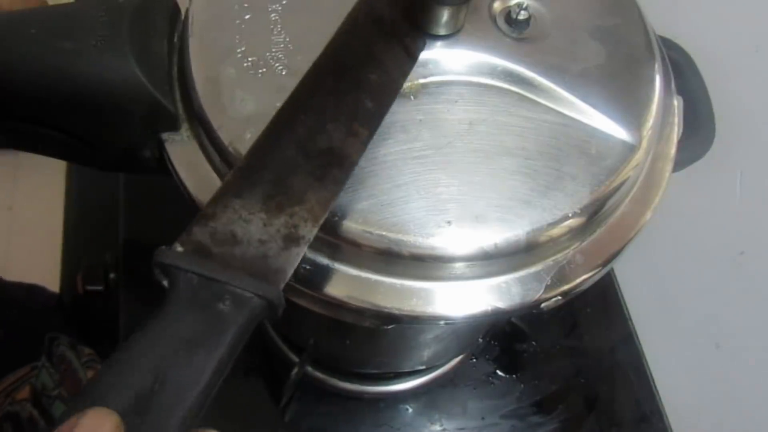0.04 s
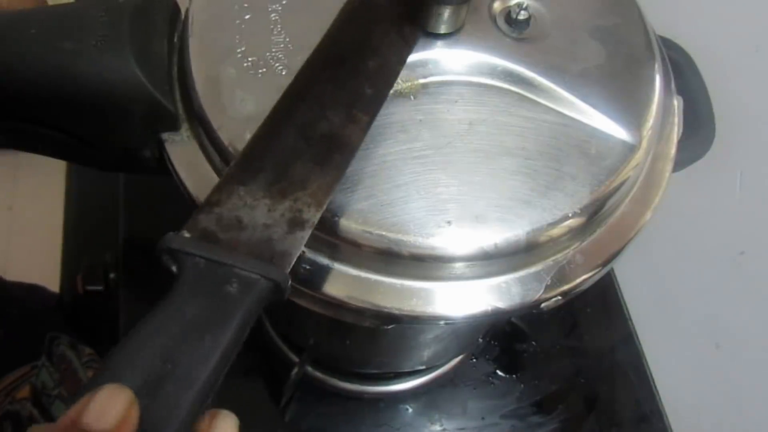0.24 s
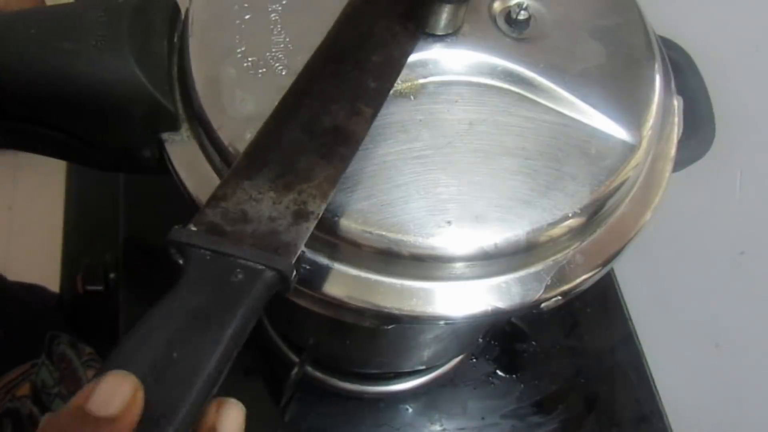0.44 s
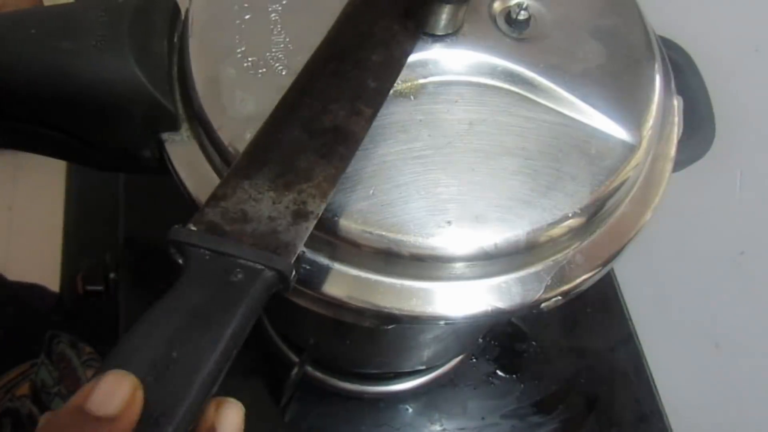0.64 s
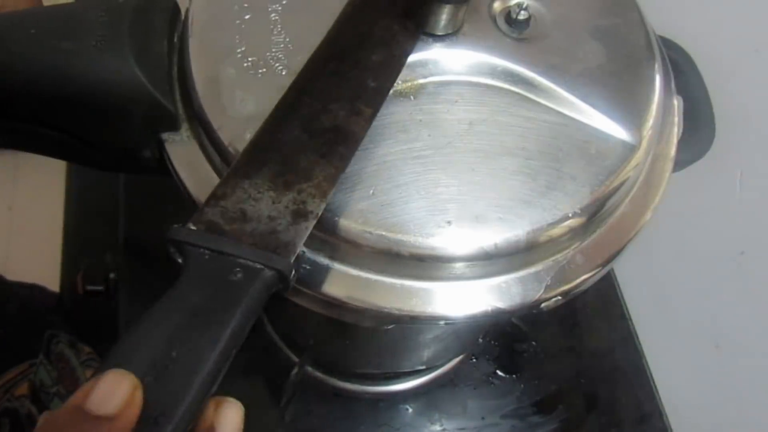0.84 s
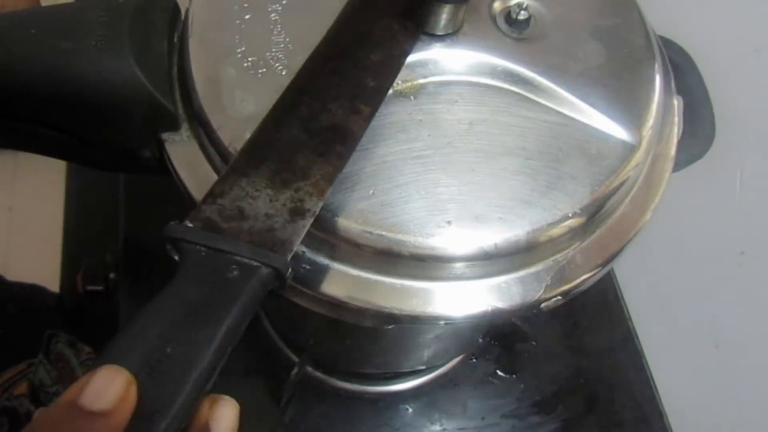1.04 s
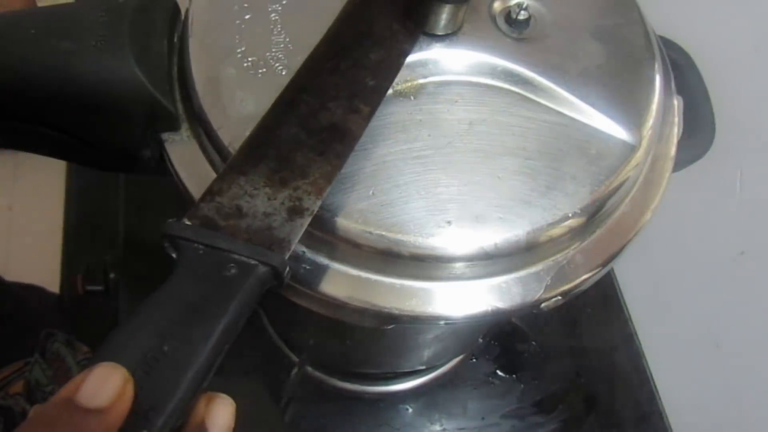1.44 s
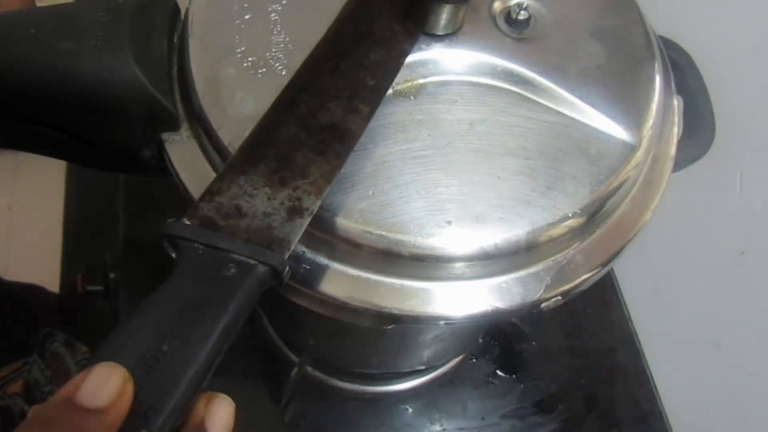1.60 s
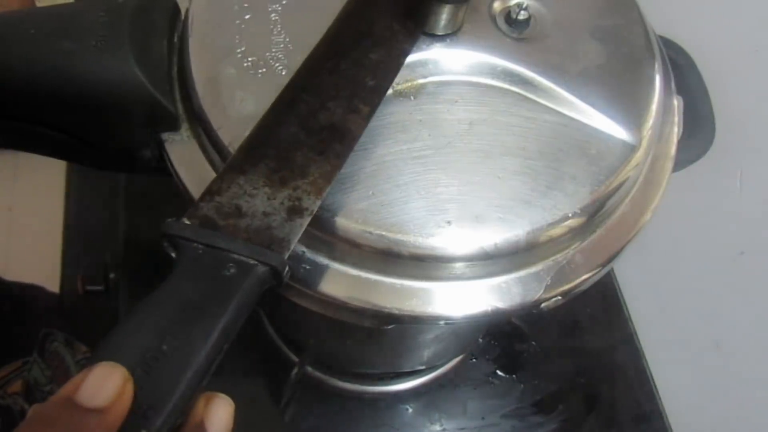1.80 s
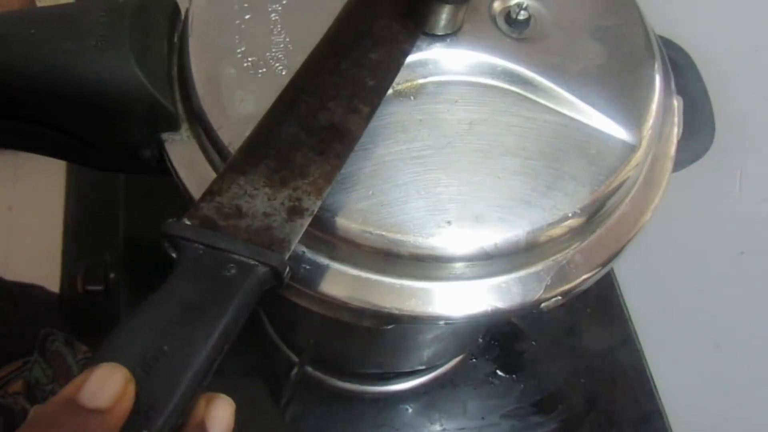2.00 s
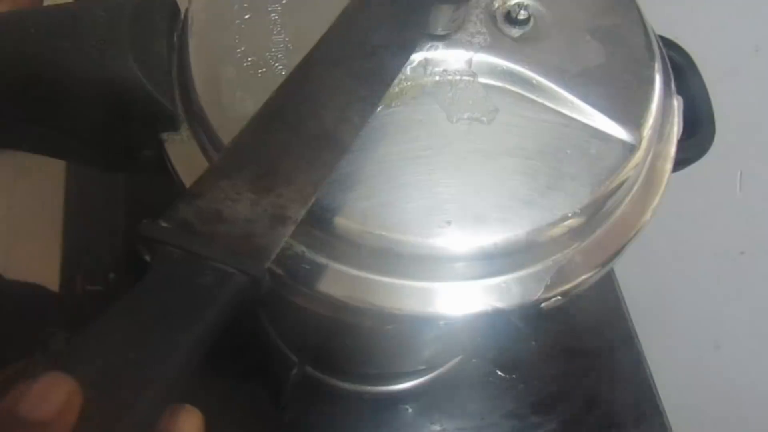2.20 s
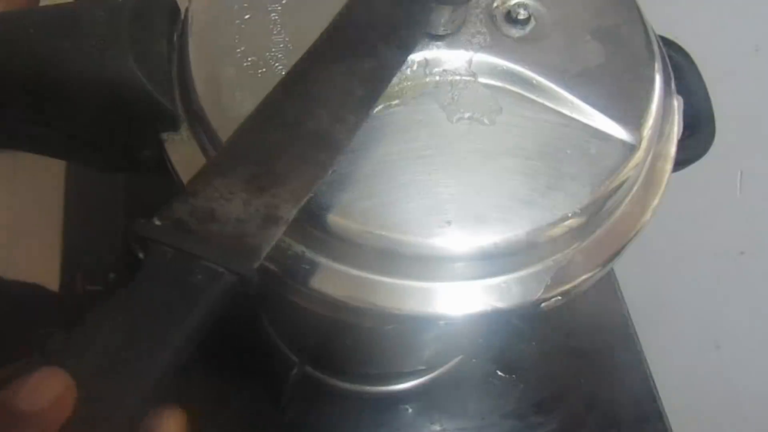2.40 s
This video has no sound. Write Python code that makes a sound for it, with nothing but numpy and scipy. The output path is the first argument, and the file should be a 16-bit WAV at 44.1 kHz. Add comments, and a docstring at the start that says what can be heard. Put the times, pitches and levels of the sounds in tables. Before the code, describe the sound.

A pressure cooker releases a bright, hissing jet of steam before its weight clinks back down.

```python
"""A bright jet of steam blows from a pressure cooker for two seconds, ringing the cavities of its valve.
A thin whistle leaks first; then a knife lifts the weight, and wet steam sputters as the jet opens.
The weight sinks, the jet dies to a sizzling leak, and the metal knocks on the lid as it settles.
The cooker is close by in a kitchen, with the burner running underneath."""
import sys
import numpy as np
from scipy import signal
from scipy.fft import rfft, irfft
from scipy.io import wavfile
from scipy.ndimage import uniform_filter1d

SR = 44100
rng = np.random.default_rng(int(sys.argv[2]) if len(sys.argv) > 2 else 0)


def inscribe(sig):
    """Save sig as 16-bit PCM at rate SR to the path in sys.argv[1].

    A 1-D sig is mono; a 2-D sig holds one channel per row.
    Samples are clipped to [-1, 1] before scaling.
    """
    pcm = np.round(np.clip(np.atleast_2d(sig).T, -1, 1) * 32767)
    wavfile.write(sys.argv[1], SR, pcm.astype(np.int16))


N = 112454


def undb(db):
    """Decibels to amplitude ratio."""
    return 10 ** (np.asarray(db) / 20)


def unit(x):
    """Normalisation to rms 1."""
    return x / np.sqrt(np.mean(x ** 2))


def envelope(rows):
    """Gain interpolated through (seconds, dB) points, silent outside them."""
    s, db = np.array(rows).T
    return undb(np.interp(np.arange(N) / SR, s, db, left=-np.inf, right=-np.inf))


def colour(x, spectrum, resonances=()):
    """Source-filter model: a broad spectrum and narrow resonances shape x; the result has rms 1."""
    f = np.arange(N // 2 + 1) * SR / N + 1
    hz, db = np.array(spectrum).T
    gain = undb(np.interp(np.log(f), np.log(hz), db))
    for centre, width, lift in resonances:
        detuning = 2 * (f - centre) / width
        gain *= np.sqrt(1 + (undb(lift) ** 2 - 1) / (1 + detuning ** 2))
    return unit(irfft(rfft(x) * gain, N))


def wander(hz):
    """Low-passed noise: smooth random motion of rms 1."""
    span = max(int(SR / hz), 1)
    return unit(uniform_filter1d(uniform_filter1d(rng.standard_normal(N), span), span))


def strike(rows, ring):
    """Superposition of a fresh ring(age) per (seconds, dB) row, levelled by its first 10 ms."""
    out, age = np.zeros(N), np.arange(N) / SR
    for s, db in rows:
        start, sound = int(s * SR), ring(age)
        out[start:] += undb(db) * sound[:N - start] / np.std(sound[:SR // 100])
    return out


def kitchen(x, wet_db, t60_s=0.18):
    """Reverberation: dense reflections from hob and walls decay exponentially."""
    age = np.arange(SR // 2) / SR
    tail = rng.standard_normal(len(age)) * np.exp(-np.log(1000) * age / t60_s) * (age > .002)
    return x + undb(wet_db) * signal.fftconvolve(x, tail / np.linalg.norm(tail))[:N]


# Spectrum of the burner. Each row: frequency in Hz, relative density in dB.
BURNER_SPECTRUM = [(25, -20), (45, -21), (64, -10.5), (85, -4.5), (165, -4), (230, -1.5), (320, 1.5),
                   (700, -2), (1400, 2), (1900, -6.5), (4000, -3.5), (5200, -14), (6600, -12), (7400, -17),
                   (8000, -31), (11000, -20), (15000, -37)]

def burner(level_db=-50, waver_db=1.9):
    """Random amplitude modulation: the burner's broadband noise wavers slowly."""
    noise = colour(rng.standard_normal(N), BURNER_SPECTRUM)
    return noise * undb(level_db + waver_db * wander(hz=9.6))


# Course of the low rush. Each row: time in seconds, level in dB.
RUSH_LEVELS = [(0, -46.5), (.2, -53), (.3, -47), (.5, -57), (.95, -49), (1.15, -61), (2.08, -56.5),
               (2.12, -55), (2.2, -80), (2.55, -73)]
# Its spectrum. Each row: frequency in Hz, relative density in dB.
RUSH_SPECTRUM = [(25, -13), (62, -8), (110, -3.5), (170, -5.5), (230, -5.5), (310, 4), (600, -6.5),
                 (1200, -10), (3000, -29)]

def rush():
    """Flow noise: the low-frequency part of the escaping steam."""
    return colour(rng.standard_normal(N), RUSH_SPECTRUM) * envelope(RUSH_LEVELS)


# Whistle of the seated valve. Each row: time in seconds, level in dB.
WHISTLE_LEVELS = [(0, -70), (.045, -61), (.115, -61), (.14, -72)]

def whistle(pitch_hz=6590, waver=.003):
    """Edge tone: the leak sounds one wavering pitch before the weight lifts."""
    hz = pitch_hz * (1 + waver * wander(hz=400))
    return np.sqrt(2) * np.sin(2 * np.pi * np.cumsum(hz) / SR) * envelope(WHISTLE_LEVELS)


# Modes of the lid. Each row: frequency in Hz, relative level in dB, time to fall 60 dB in seconds.
LID_MODES = [(343, -2, 0.54), (425, -3.5, 0.25), (553, 3, 0.075), (610, 1, .11), (790, -7, 0.09),
             (896, 7.5, .06), (1056, -5, 0.058), (1350, -7, 0.096), (1574, 3, 0.07), (2340, 4, 0.047)]
# Knocks of weight and knife on the lid. Each row: start in seconds, level in dB.
KNOCKS = [(2.112, -37), (2.457, -33.5), (2.4698, -29), (2.5005, -36), (2.522, -46), (2.543, -51)]
# Spectrum of the contact. Each row: frequency in Hz, relative density in dB.
CRACK_SPECTRUM = [(120, -31), (240, -24), (340, 0), (900, 7), (1600, -1), (3000, -7), (7000, -21),
                  (15000, -42)]

def knocks(spread_db=2.6, crack_db=6.5, crack_decay_s=0.0065):
    """Modal vibration: each impact cracks and rings the lid, which is too small to radiate bass."""
    low_cut = signal.butter(4, 300, "high", fs=SR, output="sos")

    def ring(age):
        modes = np.zeros(N)
        for hz, db, t60 in LID_MODES:
            gain = undb(db + spread_db * rng.standard_normal())
            modes += gain * np.sin(2 * np.pi * hz * age) * np.exp(-np.log(1000) * age / t60)
        crack = colour(rng.standard_normal(N), CRACK_SPECTRUM) * np.exp(-age / crack_decay_s)
        return signal.sosfilt(low_cut, modes + undb(crack_db) * crack)
    return strike(KNOCKS, ring)


# Resonances of the gap under the weight. Each row: centre in Hz, width in Hz, lift in dB.
GAP_RESONANCES = [(430, 38, 4), (680, 50, 7), (2100, 200, 6), (3580, 340, 4), (4170, 220, 7),
                  (6340, 310, 3)]

def wet_steam(levels, spectrum, drops_db, rough_db, drops_per_s=1100, spread_db=8.5):
    """Shot noise: tiny droplets burst at random in uneven steam, and both ring the gap."""
    sizes = undb(spread_db * np.minimum(rng.exponential(size=N), 4))
    bursts = rng.random(N) < drops_per_s / SR
    drops = bursts * sizes * np.sign(rng.standard_normal(N))
    flow = rng.standard_normal(N) + undb(drops_db) * unit(drops)
    roughness = undb(rough_db * wander(hz=220))
    return colour(flow * roughness, spectrum, GAP_RESONANCES) * envelope(levels)


# Course of the sizzle. Each row: time in seconds, level in dB.
SIZZLE_LEVELS = [(2.09, -50), (2.125, -32.5), (2.29, -36.5), (2.34, -50)]
# Its spectrum. Each row: frequency in Hz, relative density in dB.
SIZZLE_SPECTRUM = [(3000, -35), (7900, -20), (9500, -8), (11200, 0), (12500, -7), (15000, -21)]

def sizzle():
    """Constricted flow: wet steam sizzles finely in the narrowing gap as the weight sinks."""
    return wet_steam(SIZZLE_LEVELS, SIZZLE_SPECTRUM, drops_db=-8, rough_db=2.7)


# Sputter as the valve opens and closes. Each row: time in seconds, level in dB.
OPENING_LEVELS = [(.21, -56), (.245, -30), (.288, -27.5), (.3, -21), (.335, -27), (.354, -24.5), (.39, -37),
                  (.46, -52), (.6, -47)]
CLOSING_LEVELS = [(2.1, -55), (2.113, -27), (2.18, -28.5), (2.298, -30), (2.355, -40.5), (2.41, -36.5),
                  (2.45, -30), (2.482, -39), (2.492, -47), (2.55, -52)]
# Their spectra. Each row: frequency in Hz, relative density in dB.
OPENING_SPECTRUM = [(60, -21), (200, -15), (420, -2), (850, -3), (1900, -1.5), (3000, -11), (4300, -10),
                    (6300, -11), (7900, -23), (11000, 3), (15000, -17)]
CLOSING_SPECTRUM = [(100, -24), (320, -21.5), (1000, -7.5), (1700, -7.5), (2800, -3.5), (3500, -0.5),
                    (4200, -2), (5000, -6), (6400, -6), (7900, -18), (9500, -12.5), (11200, -8),
                    (15000, -26)]

def sputter():
    """Two-phase flow: steam and water squeeze past the half-seated weight."""
    opening = wet_steam(OPENING_LEVELS, OPENING_SPECTRUM, drops_db=-6.5, rough_db=2.1)
    closing = wet_steam(CLOSING_LEVELS, CLOSING_SPECTRUM, drops_db=-6.5, rough_db=2.3)
    return opening + closing


# Spectrum of flow through the valve. Each row: frequency in Hz, relative density in dB.
VALVE_SPECTRUM = [(100, -40), (330, -33), (1000, -23), (1750, -18.5), (2900, -17), (3450, -8.5),
                  (3900, -9.5), (4150, -5.5), (4500, -5), (5500, 1), (6750, 0.5), (7250, -10.5),
                  (7900, -22.5), (8500, -18), (9500, -14.5), (10300, -6.5), (11250, -5), (12100, -15.5),
                  (13300, -20.5), (15000, -23.5)]
# Resonances of its cavities. Each row: centre in Hz, width in Hz, lift in dB.
VALVE_RESONANCES = [(2190, 360, 7), (3630, 75, 1.5), (4248, 190, 9.5), (4770, 103, 6), (5240, 100, 2),
                    (6000, 140, 1.5), (6305, 250, 6.5)]

def valve(excitation):
    """Cavity resonance: the valve lifts narrow bands out of a bright hiss."""
    return colour(excitation, VALVE_SPECTRUM, VALVE_RESONANCES)


# Water spat through the valve. Each row: start in seconds, level in dB.
SPITS = [(.306, -19), (.342, -27), (.4465, -16.5), (2.114, -27), (2.191, -35), (2.214, -36), (2.2975, -38),
         (2.3985, -43), (2.430, -36.5)]

def spits(decay_s=0.0017):
    """Transient excitation: larger drops burst in the valve, each with a quick rise and fall."""
    return strike(SPITS, lambda age: valve(rng.standard_normal(N)) * age * np.exp(-age / decay_s))


# Strength of the free jet. Each row: time in seconds, level in dB.
JET_LEVELS = [(0, -54), (.132, -68), (.146, -50.5), (.207, -51), (.223, -27.5), (.242, -19.5), (.30, -13.5),
              (.325, -15.5), (.40, -13.5), (.447, -16.5), (.458, -18.5), (.6, -16.5), (.68, -14.5),
              (1.05, -15), (1.7, -16), (2.108, -17.5), (2.12, -20.5), (2.18, -27), (2.29, -33.5),
              (2.36, -48), (2.478, -36), (2.492, -47), (2.55, -53)]

def jet(flutter_db=0.3, surge_db=0.17):
    """Turbulence: eddies that flutter and surge slightly drive the cavities of the valve."""
    eddies = rng.standard_normal(N) * undb(flutter_db * wander(hz=224) + surge_db * wander(hz=35))
    return valve(eddies) * envelope(JET_LEVELS)


def scene():
    """Superposition in the kitchen, the jet drier than the rest; both channels alike."""
    around = sputter() + sizzle() + rush() + burner() + whistle() + spits() + knocks()
    mix = kitchen(jet(), wet_db=-15.5) + kitchen(around, wet_db=-7)
    return np.array([mix, mix])


def record(dry, top_hz=15100):
    """Band limiting: a steep low-pass filter cuts the highest treble."""
    return signal.sosfilt(signal.ellip(10, .2, 80, top_hz, fs=SR, output="sos"), dry)


dry = scene()
out = record(dry)
inscribe(out)
```